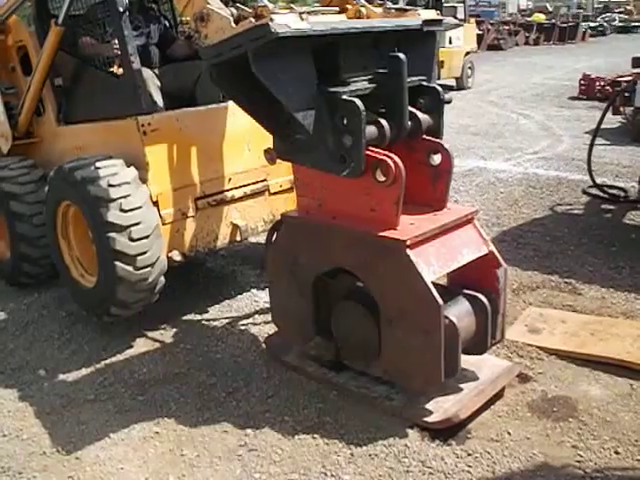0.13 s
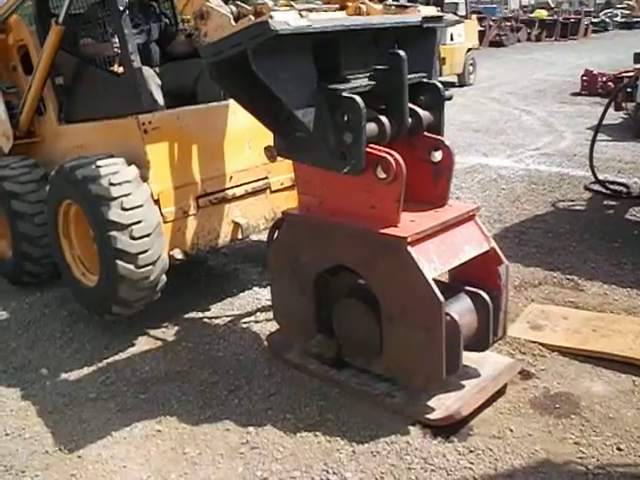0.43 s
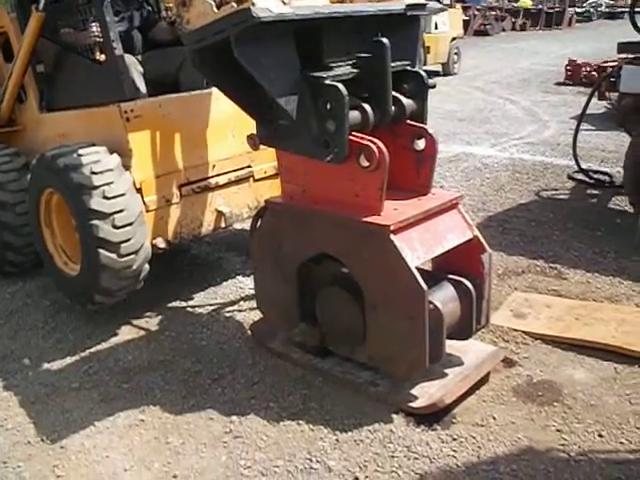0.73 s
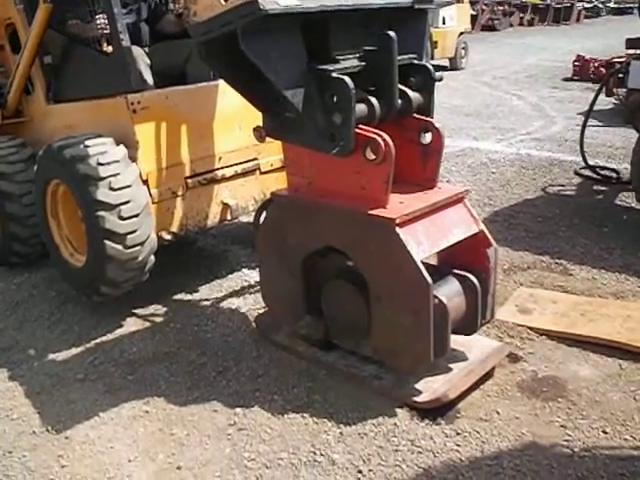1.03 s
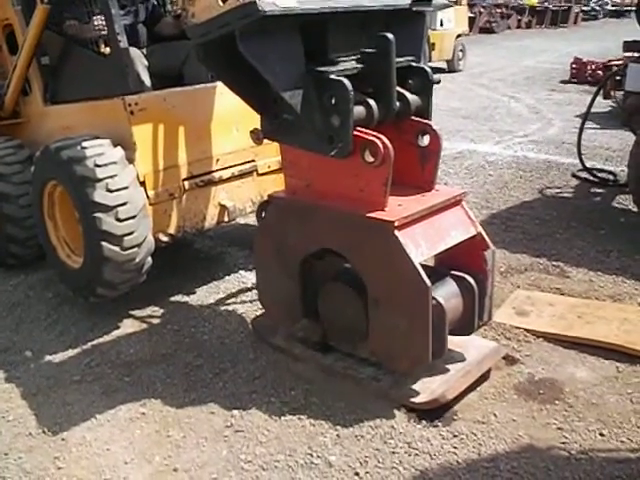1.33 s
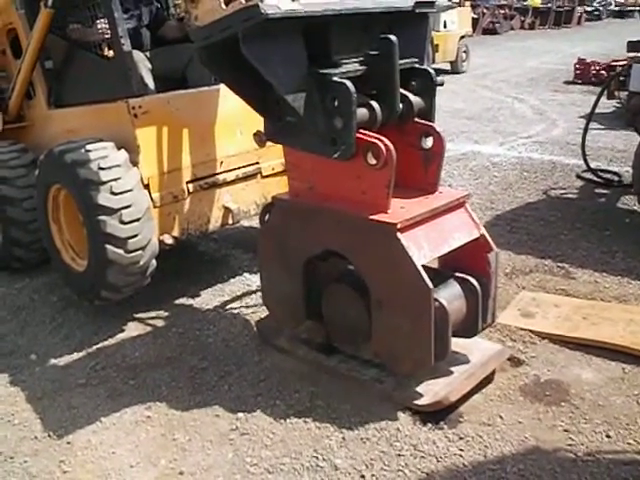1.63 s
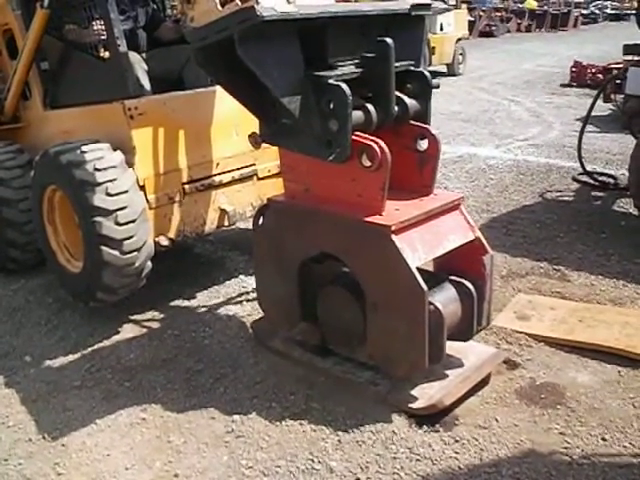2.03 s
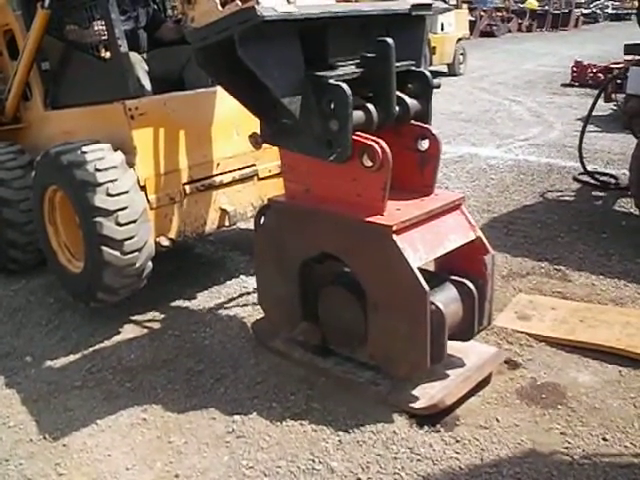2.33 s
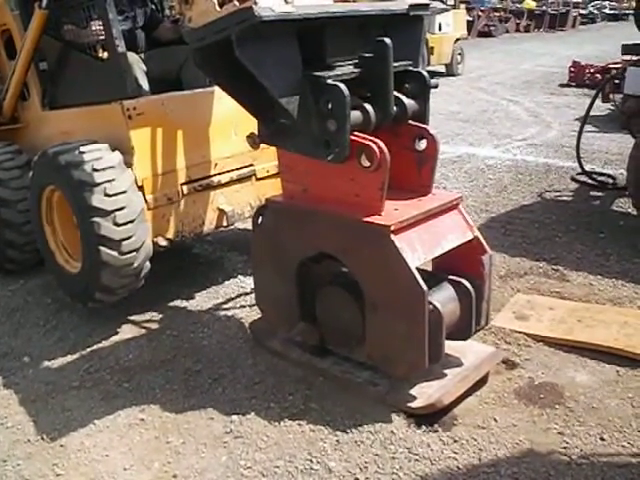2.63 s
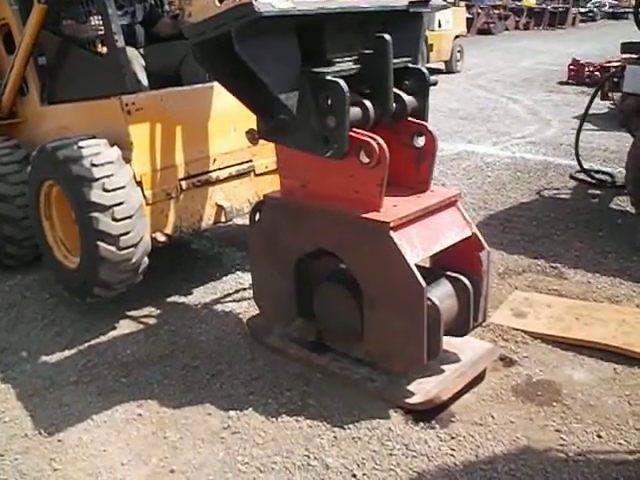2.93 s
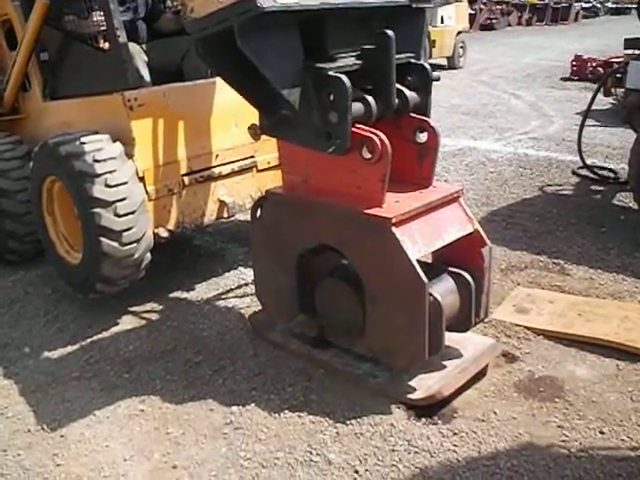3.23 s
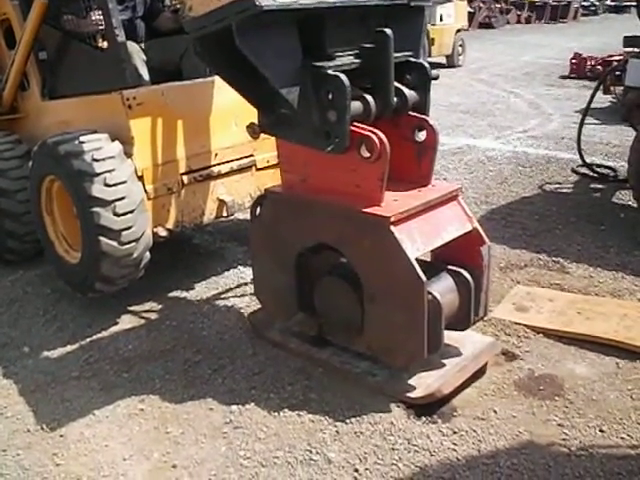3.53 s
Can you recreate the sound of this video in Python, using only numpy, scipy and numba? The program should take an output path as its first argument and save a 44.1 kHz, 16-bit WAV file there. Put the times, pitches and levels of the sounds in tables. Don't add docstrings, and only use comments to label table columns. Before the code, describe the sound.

A diesel loader idles high and loud, then its hydraulics grunt, the engine sags, and a plate compactor starts clanging, thudding and rattling on gravel until the end; open yard, few metres away, small dull camera microphone.

```python
import sys
import numpy as np
from scipy import signal
from scipy.io import wavfile
from scipy.ndimage import uniform_filter1d
from numba import njit

SR = 44100
rng = np.random.default_rng(int(sys.argv[2]) if len(sys.argv) > 2 else 0)


def dump(signal):
    limited = np.clip(np.atleast_2d(signal).T, -1, 1)
    pcm = np.round(limited * 32767).astype(np.int16)
    wavfile.write(sys.argv[1], SR, pcm)


def gain_from_db(level_db):
    decades = np.asarray(level_db, float) / 20
    return 10 ** decades


N = 162288
LOAD_S, LOAD_RISE_S = 0.813, 0.2


def level(x, db):
    return x * gain_from_db(db) / np.sqrt(np.mean(x ** 2))


@njit
def svf(x, hz, width):
    y, band, low = np.empty(len(x)), 0., 0.
    g, k = np.tan(np.pi * hz / SR), width / hz
    for i in range(len(x)):
        v = (band + g * (x[i] - low)) / (1 + g * (g + k))
        band, low, y[i] = 2 * v - band, low + 2 * g * v, k * v
    return y


def resonance(x, hz, width):
    return svf(svf(x, float(hz), float(width)), float(hz), float(width))


def walk(rate):
    hold = int(SR / rate)
    steps = np.repeat(rng.standard_normal(N // hold + 1), hold)
    return 1.25 * uniform_filter1d(uniform_filter1d(steps, hold), hold)[:N]


# t/s, crankshaft f/Hz, exhaust boom level/dB, pump whine level/dB,
# plate shaking level/dB
DRIVE = [(0, 47.8, -22.5, -29, 0), (.35, 47.7, -20, -27.5, 0), (.62, 47.7, -21, -29, 0),
         (.71, 47.15, -18.5, -25, 0), (.78, 46.56, -23, -29.5, 0), (.82, 45.43, -19, -17.5, 1),
         (.89, 44.32, -28.5, -15, 5), (.97, 44.16, -26.5, -14.5, 2), (1.079, 44.32, -41.5, -23, 5),
         (1.239, 44.83, -31.5, -25.5, 0.5), (1.39, 44.79, -30.5, -18.5, 1), (1.58, 44.77, -31, -18, 2.5),
         (1.799, 44.6, -28, -20, 1.5), (2.1, 44.63, -29.5, -16.5, 3.5), (2.501, 44.7, -30.5, -19, 0),
         (2.949, 44.69, -31, -19.5, -3.5), (3.25, 44.63, -34, -21.5, -11), (3.68, 44.6, -32, -22, -12)]


def drive(column):
    table = np.array(DRIVE)
    return np.interp(np.arange(N) / SR, table[:, 0], table[:, column])


# shaft order, level/dB at idle, level/dB under load
SHAFT_TONES = [(4.023, -39.5, -41), (6.765, -27.5, -34.5), (8.07, -37, -59), (9.01, -28.5, -39.5),
               (11.97, -32.5, -64), (13.71, -39, -39), (13.92, -42, -35.5), (18.03, -27.5, -36),
               (21.97, -35.5, -37), (27.14, -37, -44.5)]
# harmonic, level/dB re fundamental at idle, level/dB under load
PUMP_OVERTONES = [(2, 2.5, -8.5), (3, -13.5, -18)]


def tones(turns, load):
    def tone(order, db, wobble):
        loudness = np.sqrt(2) * gain_from_db(db + wobble * walk(8.94))
        return loudness * np.sin(2 * np.pi * order * turns + 0.15 * wobble * walk(11))

    boom = tone(2, drive(2), 0.62 + 0.71 * load)
    whine_db = drive(3)
    out = boom + tone(10, whine_db, 1.0)
    settle = np.exp(-np.maximum(np.arange(N) / SR - LOAD_S, 0) / 0.3)
    settle_db = -5.5 * load * settle
    for harmonic, idle_db, load_db in PUMP_OVERTONES:
        db = whine_db + idle_db + (load_db - idle_db) * load + settle_db
        out = out + tone(10 * harmonic, db, 0.9)
    for order, idle_db, load_db in SHAFT_TONES:
        out = out + tone(order, idle_db + (load_db - idle_db) * load + 0.8, 1.1)
    return out


# f/Hz, width/Hz, level/dB
PANELS = [(307, 230, -4.5), (630, 300, -2), (920, 260, -1), (1577, 370, -6.5), (2907, 850, -6),
          (4080, 640, -15.5), (5025, 760, -14)]


def combustion_knock(turns, load):
    firing = np.floor(2 * turns).astype(int)
    strength = gain_from_db(2.5 * rng.standard_normal(firing[-1] + 1))[firing]
    puff = strength * np.exp(-(2 * turns % 1))
    puff = uniform_filter1d(puff, size=90)
    knock = 0
    for hz, width, db in PANELS:
        ring = level(resonance(puff * rng.standard_normal(N), hz, width), 0)
        knock = knock + gain_from_db(db + 0.95 * walk(14)) * ring
    return level(knock, -25.5) * gain_from_db(5.5 * (0.5 - load))


# f/Hz, level/dB per Hz
ROAR = [(18, -56), (30, -18.5), (87, -5), (148, -13.5), (322, -7.5), (953, -3), (2020, -24), (4910, -22.5),
        (6000, -51), (7800, -85), (13200, -120)]


def fan_and_intake_roar():
    roar, swell = 0, walk(5.4)
    log_hz, curve_db = np.log(np.array(ROAR)[:, 0]), np.array(ROAR)[:, 1]
    for hz in 30 * 2 ** np.arange(0, 7.8, 0.5):
        db = np.interp(np.log(hz), log_hz, curve_db) + 0.65 * swell + 2.4 * walk(14)
        roar = roar + gain_from_db(db) * resonance(rng.standard_normal(N), hz, hz / 2)
    return level(roar, -23)


def engine_rumble(load):
    return level(resonance(rng.standard_normal(N), 44, 40), -39) * gain_from_db(-4 * (1.5 - load))


# t/s, peak level/dB
TICKS = [
    (0.0368, -21),
    (1.5193, -31),
    (3.1784, -39),
    (3.617, -41),
    (3.679, -30),
]


def brief_ticks():
    ticks = np.zeros(N)
    when, peak_db = np.array(TICKS).T
    ticks[(when * SR).astype(int).clip(0, N - 1)] = gain_from_db(peak_db)
    return ticks


# f/Hz, width/Hz, level/dB, t60/s
HISS = [
    (3870, 2300, -7.5, .11),
    (3500, 2200, -14.5, 0.091),
    (1090, 670, -10.5, .03),
    (242, 260, -7.5, 0.11),
]
EARLY_HISS, LATE_HISS, DULL_HISS, LOW_HISS = HISS


def blows(events, modes, rise_s, hiss, size):
    out, t = np.zeros(N + size), np.arange(size) / SR
    hz, db, t60 = np.array(modes).T[:, :, None]
    hiss_hz, width_hz, hiss_db, hiss_t60 = hiss

    def fade(t60_s):
        return np.exp(-np.log(1000) * np.maximum(t - rise_s, 0) / t60_s)

    for s, peak_db in events:
        mix, detune, phase = rng.standard_normal(size=(3, len(modes), 1))
        cycles = hz * (1 + 0.01 * detune) * (t - rise_s) + 0.21 + 0.14 * phase
        ring = (gain_from_db(db + 1.8 * mix) * np.sin(2 * np.pi * cycles) * fade(t60)).sum(axis=0)
        spray = level(resonance(rng.standard_normal(size), hiss_hz, width_hz), hiss_db)
        hit = ring / np.sqrt(np.sum(gain_from_db(2 * db))) + spray * fade(hiss_t60)
        hit = hit * np.minimum(t / rise_s, 1) ** 0.9
        start = int(s * SR)
        out[start:start + size] += gain_from_db(peak_db) * hit / np.abs(hit).max()
    return out[:N]


# f/Hz, level/dB, t60/s
FRAME = [(2634, -8.5, 0.12), (2920, -5.5, 0.085), (3090, -1, 0.076), (3155, -1, 0.048), (3710, -7, 0.08),
         (4110, -15, 0.074), (4700, -13.5, 0.076), (5090, -15.5, 0.05), (1380, -15, 0.071)]


def frame_blows(events, hiss):
    return gain_from_db(3.5) * blows(events, FRAME, 0.001496, hiss, size=4096)


# t/s, peak level/dB
FURTHER_CLANGS = [(0.082, -30), (0.168, -26), (0.2, -24.5), (0.36, -20.5), (0.611, -22), (0.65, -21.5), (0.719, -20),
                  (0.8685, -21), (1.058, -19), (1.195, -19.5), (1.392, -18.5), (1.767, -24)]


def further_clangs():
    return frame_blows(FURTHER_CLANGS, EARLY_HISS)


# t/s, peak level/dB
VALVE = [(0.808, -9)]
# f/Hz, level/dB, t60/s
VALVE_MODES = [(624, 2, 0.098), (562, -7.5, 0.22)]


def valve_grunt():
    return gain_from_db(2.5) * blows(VALVE, VALVE_MODES, 0.019, DULL_HISS, size=8192)


# f/Hz, level/dB, t60/s
PLATE = [(642, -2, 0.026), (753, -2.5, 0.031), (911.9, -2.5, 0.028), (976, 0, 0.024), (1258, -5.5, 0.031),
         (1480, -5, 0.02)]
# t/s, peak level/dB
PLATE_THUDS = [(0.821, -12.5), (0.942, -8), (1.091, -4), (1.129, -5.5), (1.237, -6), (1.297, -11),
               (1.374, -14), (1.511, -13.5), (1.555, -7.5), (1.583, 0), (1.66, -7), (1.742, -12),
               (2.083, -8.5), (2.244, -10.5), (2.361, -8), (2.464, -14.5), (2.644, -10), (2.683, -4.5),
               (2.923, -11.5), (2.952, -9), (3.027, -4.5), (3.104, -6), (3.165, -7.5), (3.174, -2.5),
               (3.25, -5), (3.319, -5), (3.391, -5.5), (3.464, -9), (3.538, -5), (3.611, -5.5)]
# t/s, peak level/dB
KNOCKS = [(0.998, -6.5), (1.058, -8.5), (1.147, -4), (1.167, -5), (1.258, -10.5), (1.331, -11),
          (1.342, -10.5), (1.399, -11.5), (1.439, -8.5), (1.567, -6), (1.678, -8.5), (1.7, -13),
          (1.774, -13.5), (1.815, -16), (1.918, -12.5), (1.972, -11), (2.263, -13.5), (2.282, -13),
          (2.493, -10), (2.536, -16.5), (2.584, -9), (2.607, -7.5), (2.718, -11.5), (2.74, -8),
          (2.761, -9.5), (2.808, -12), (2.835, -10), (2.878, -15), (2.902, -12.5), (2.989, -12),
          (3.014, -6.5), (3.218, -15), (3.29, -16.5)]


def plate_thuds():
    early_s, rise_s = 0.0045, 0.008
    growing = [(s - early_s, db + 2.5 * (s - N / SR)) for s, db in PLATE_THUDS]
    light = [(s - early_s, db) for s, db in KNOCKS]
    heavy_thuds = blows(growing, PLATE, rise_s, DULL_HISS, size=4096)
    light_knocks = blows(light, PLATE, rise_s, DULL_HISS, size=4096)
    return gain_from_db(2.5) * (heavy_thuds + gain_from_db(-4.5) * light_knocks)


# t/s, peak level/dB
EARLY_CLANGS = [(0.9123, -25), (0.9436, -36), (0.989, -23.5), (1.0215, -15), (1.0873, -13), (1.1357, -19),
                (1.1682, -19), (1.23, -15.5), (1.3017, -14), (1.372, -14.5), (1.4435, -14.5), (1.5129, -16),
                (1.5617, -23.5), (1.5893, -16), (1.6624, -17), (1.7341, -18.5), (1.8091, -34),
                (1.8456, -30), (1.88, -21), (1.9174, -25), (1.9482, -22.5), (1.9886, -25.5), (2.0207, -27),
                (2.0514, -26.5)]
# t/s, peak level/dB
LATE_CLANGS = [(2.1692, -23.5), (2.2066, -24.5), (2.244, -24.5), (2.2818, -26), (2.316, -27),
               (2.352, -25.5), (2.3862, -25.5), (2.4583, -21.5), (2.5307, -32), (2.6096, -23.5),
               (2.6456, -25.5), (2.678, -21.5), (2.7176, -27), (2.7503, -19.5), (2.8272, -23),
               (2.903, -20.5), (2.9702, -24.5), (2.9992, -25.5), (3.05, -24), (3.121, -18.5),
               (3.1966, -19.5), (3.2313, -30), (3.2695, -26.5), (3.338, -23), (3.4117, -22.5), (3.484, -18),
               (3.5545, -22), (3.629, -19.5)]


def frame_clangs():
    return frame_blows(EARLY_CLANGS, EARLY_HISS) + frame_blows(LATE_CLANGS, LATE_HISS)


def weight_rattle():
    t = np.arange(N) / SR
    weight_hz, rattle_decay_s = 27.37, 0.012
    engaged = np.clip((t - 0.92) / 0.055, 0, 1)
    turns = weight_hz * (t - LATE_CLANGS[0][0]) + 100
    strength = gain_from_db(3.2 * rng.standard_normal(size=300))[turns.astype(int)]
    gate = strength * np.exp(-(turns % 1) / weight_hz / rattle_decay_s)
    burst = gate * rng.standard_normal(N)
    rattle = svf(burst, 810., 500.)
    rattle = (rattle + gain_from_db(5.5) * svf(burst, 685., 90.) + gain_from_db(-17.0) * svf(burst, 2300., 1200.)
              + gain_from_db(8.0) * svf(burst, 1410., 210.))
    shudder = svf(svf(rng.standard_normal(N), 240., 140.), 250., 160.)
    ground = resonance(gate, 55, 30)
    steady = gain_from_db(drive(4)) * level(rattle, -32) + level(shudder, -30) + level(ground, -50.5)
    return engaged * steady


# t/s, peak level/dB
BUMPS = [(1.005, -12.5), (1.056, -15.5), (1.129, -12.5), (1.206, -14), (1.406, -12), (1.728, -21),
         (2.009, -16), (2.071, -20), (2.356, -19), (2.531, -17), (2.878, -19.5), (3.112, -19.5),
         (3.306, -27), (3.595, -24)]
# f/Hz, level/dB, t60/s
ROCKING = [(138, 0, .14), (196, -3.5, 0.11), (231.7, 4.5, 0.22), (292, -4, 0.14)]


def rocking_bumps():
    rise_s = 0.018
    events = [(s - rise_s / 2, db) for s, db in BUMPS]
    return gain_from_db(-2) * blows(events, ROCKING, rise_s, LOW_HISS, size=8192)


def scene():
    t = np.arange(N) / SR
    turns = np.cumsum(drive(1)) / SR
    load = np.clip((t - LOAD_S) / LOAD_RISE_S + 0.5, 0, 1)
    engine = combustion_knock(turns, load) + fan_and_intake_roar() + engine_rumble(load)
    compactor = further_clangs() + plate_thuds() + frame_clangs() + weight_rattle() + rocking_bumps()
    near = engine + valve_grunt() + compactor
    echo_t = t[:N // 20]
    echoes = rng.standard_normal(N // 20) * np.exp(-np.log(1000) * echo_t / 0.12)
    yard = signal.fftconvolve(near, echoes / np.sqrt(np.sum(echoes ** 2)))[:N]
    return (near + gain_from_db(-12) * yard + tones(turns, load))[None]


def roll_off(x):
    return signal.sosfilt(signal.butter(12, 15800, fs=SR, output="sos"), x)


def record(dry):
    rounded = np.tanh(1.075 * dry) / 1.1
    x = signal.sosfilt(signal.butter(N=12, Wn=5110, fs=SR, output="sos"), rounded)
    x = signal.sosfilt(signal.ellip(10, .5, 70, 6140, fs=SR, output="sos"), x)
    x = x - 0.003
    is_open = np.arange(N) / SR > 0.0365
    return roll_off((x + brief_ticks()) * is_open)


dry = scene()
out = record(dry)
dump(out)
```